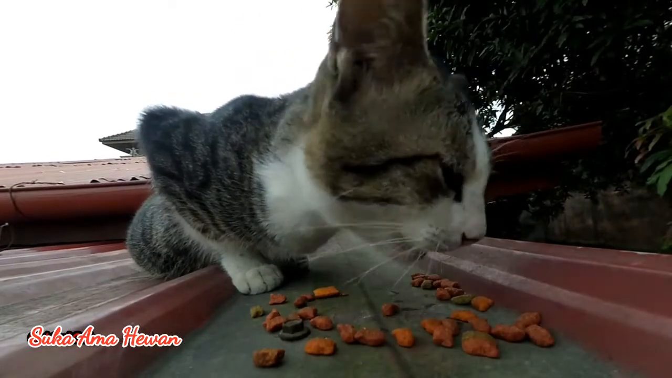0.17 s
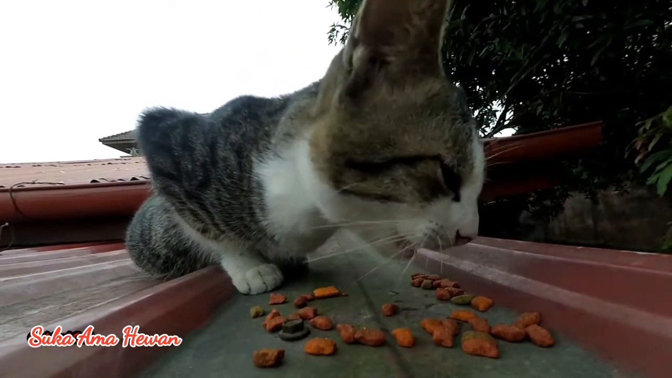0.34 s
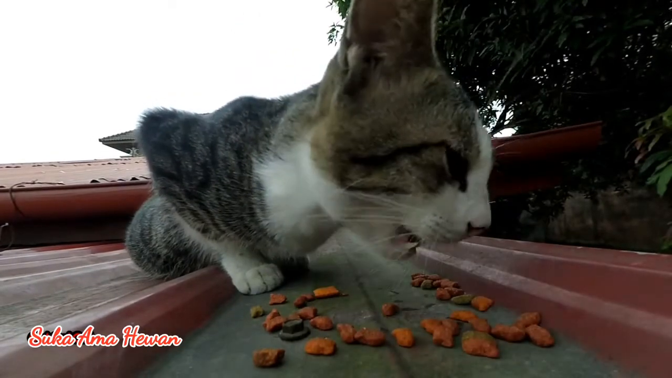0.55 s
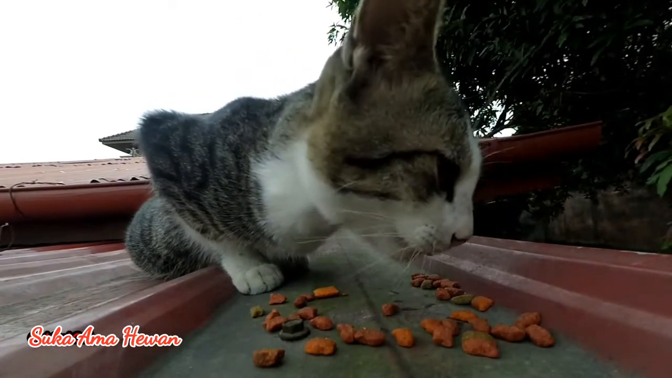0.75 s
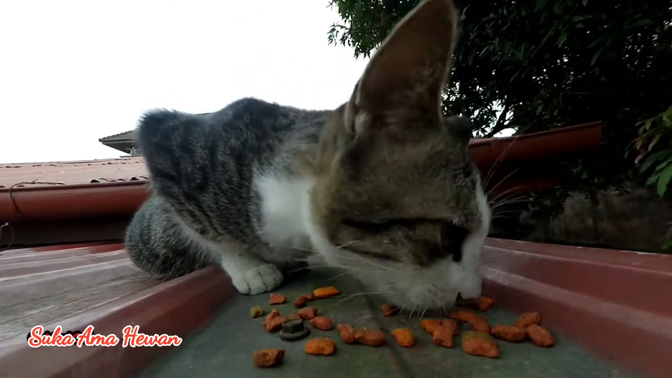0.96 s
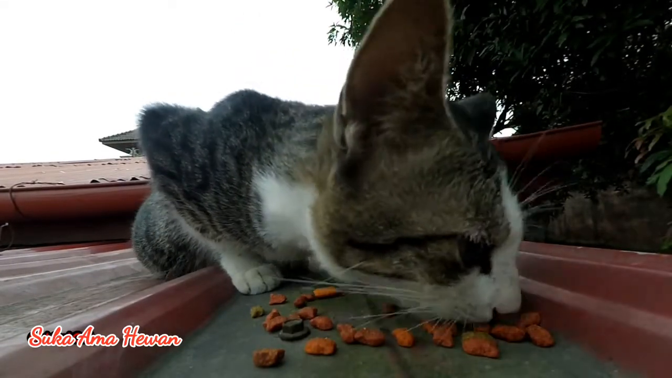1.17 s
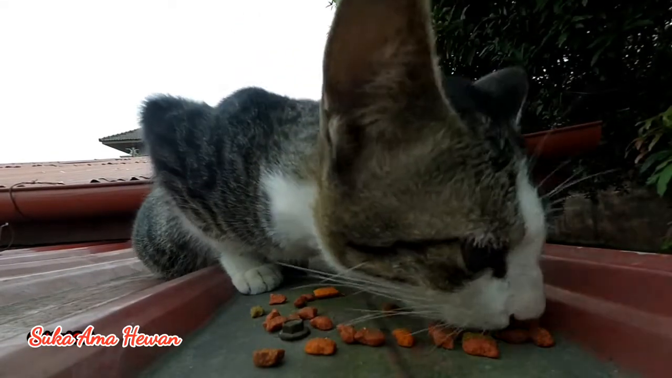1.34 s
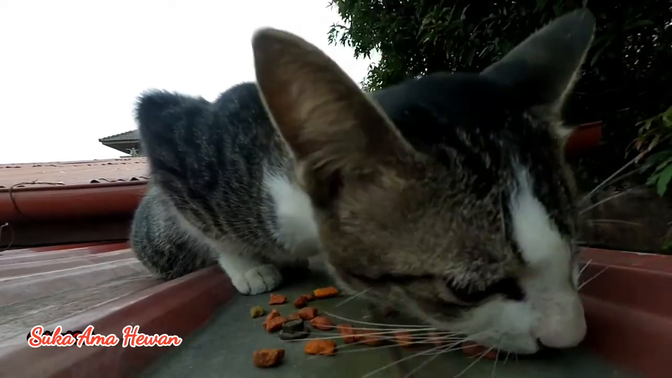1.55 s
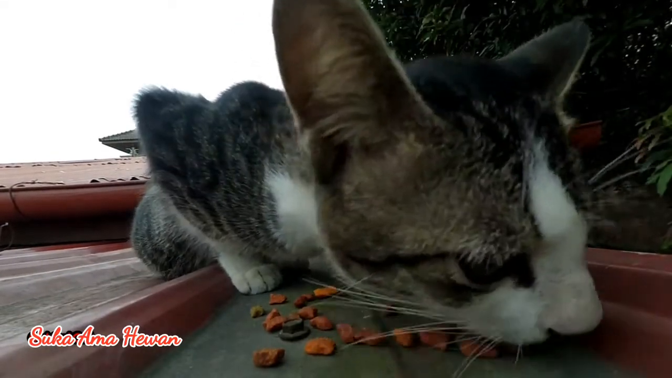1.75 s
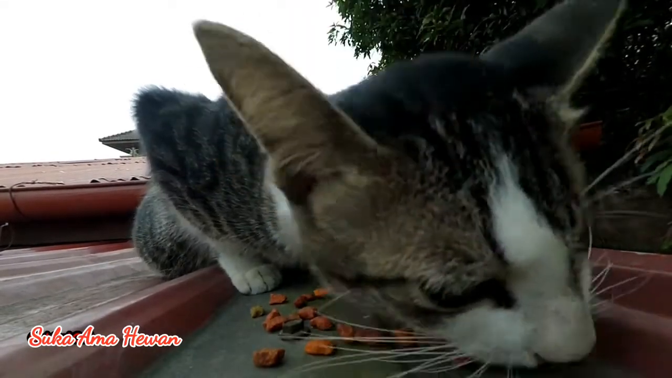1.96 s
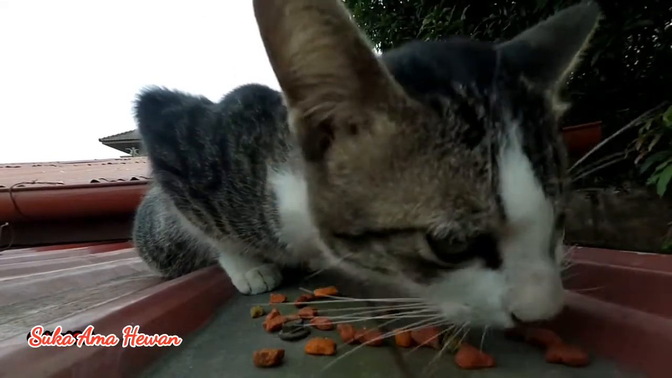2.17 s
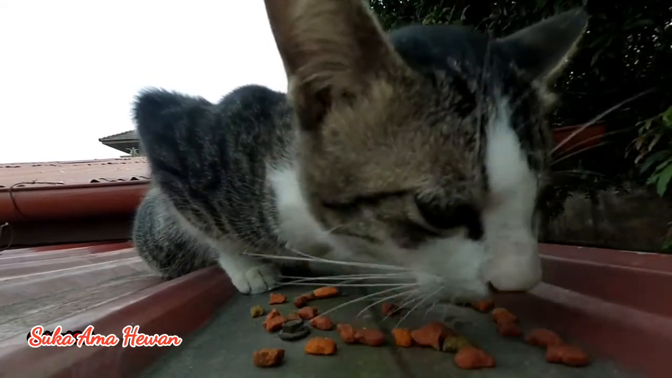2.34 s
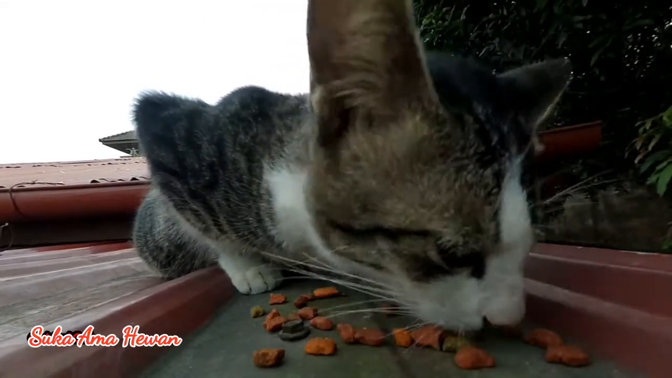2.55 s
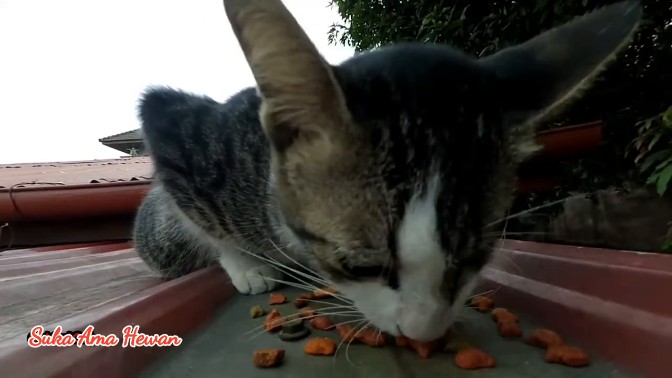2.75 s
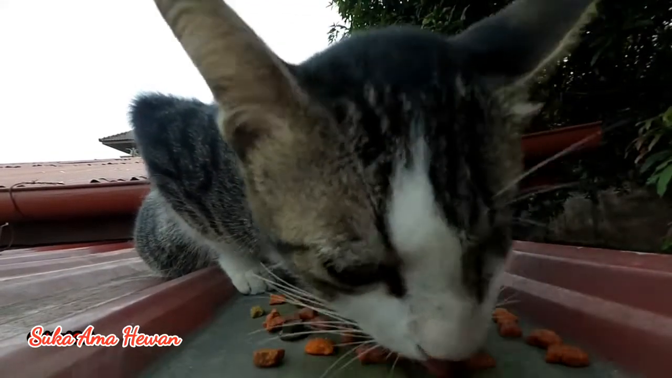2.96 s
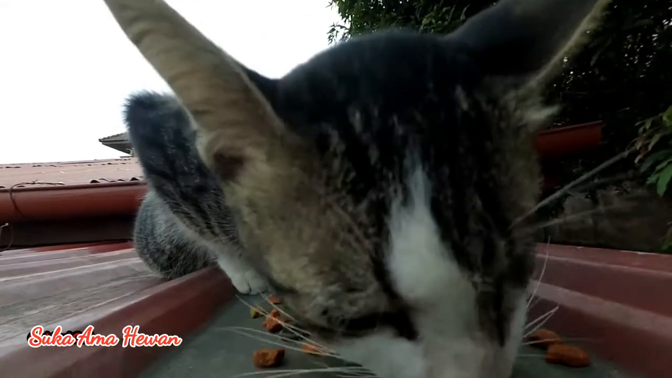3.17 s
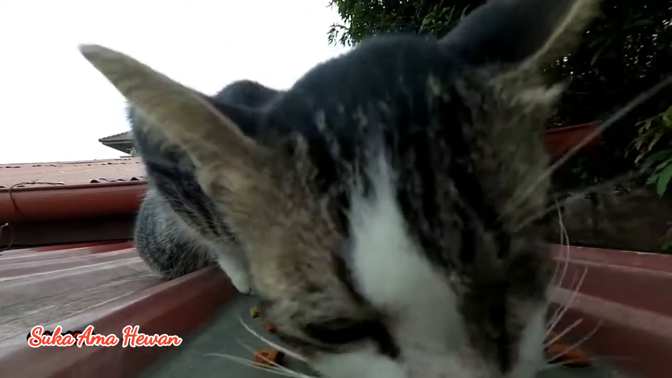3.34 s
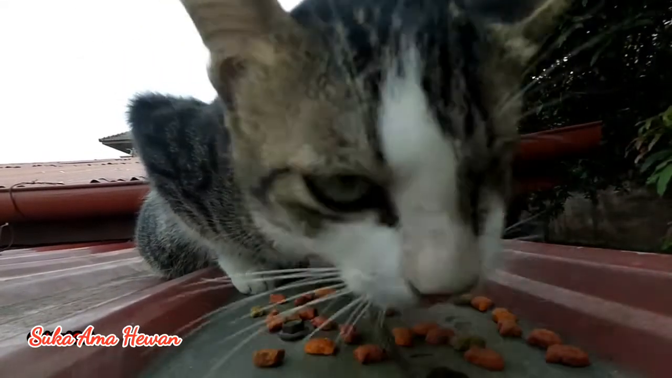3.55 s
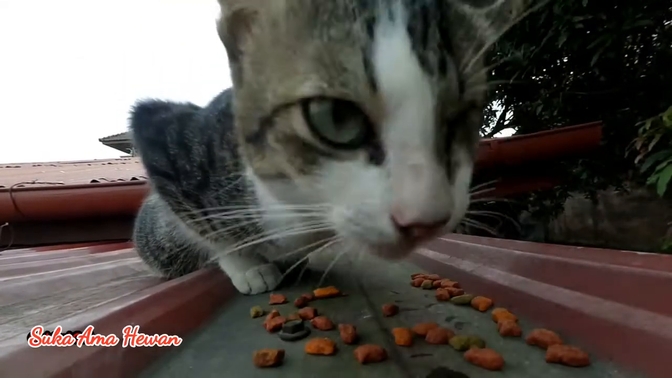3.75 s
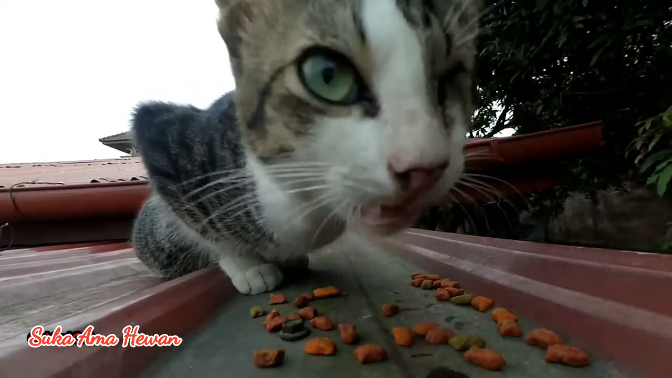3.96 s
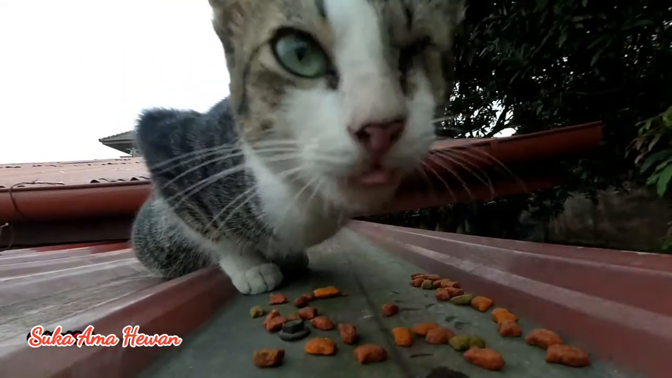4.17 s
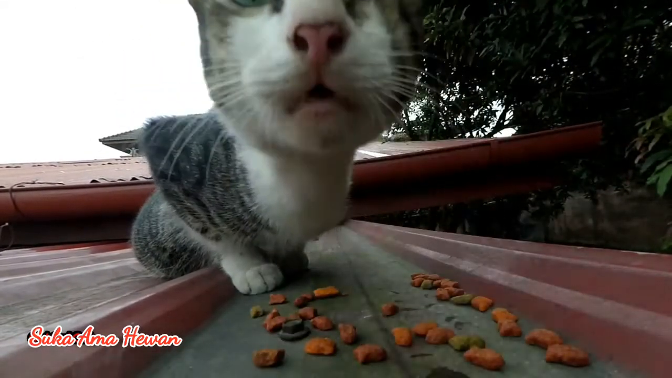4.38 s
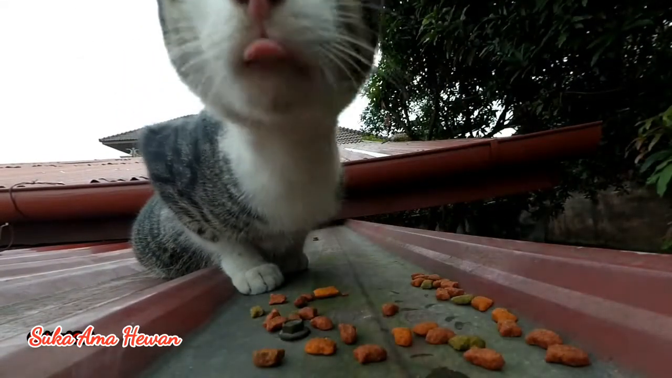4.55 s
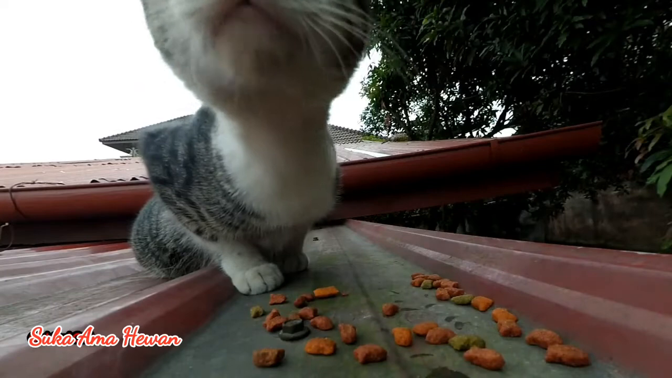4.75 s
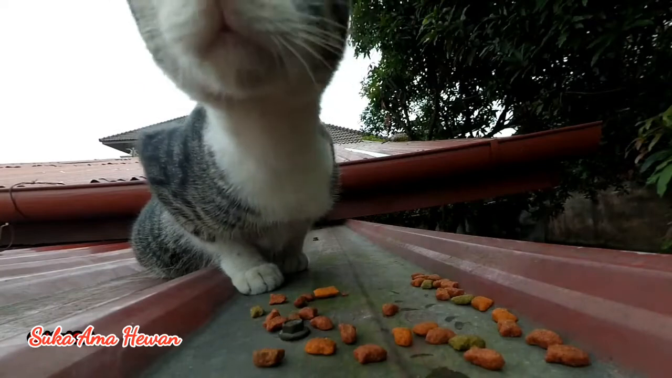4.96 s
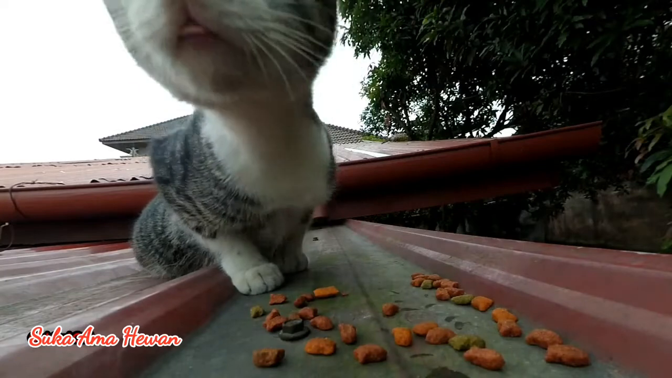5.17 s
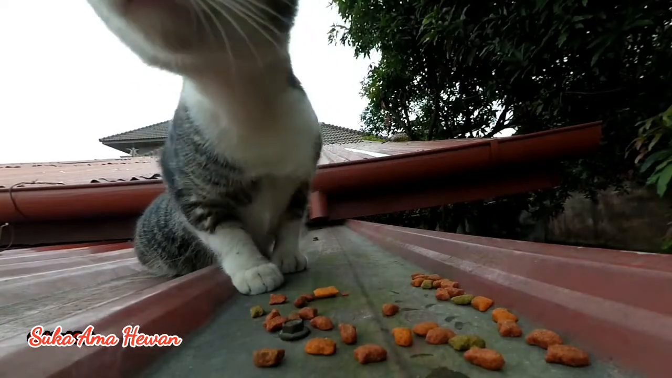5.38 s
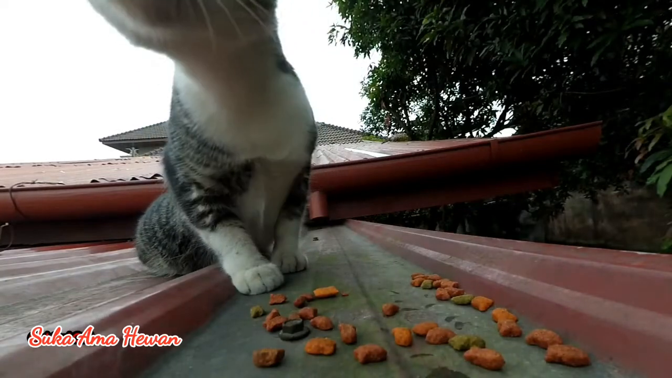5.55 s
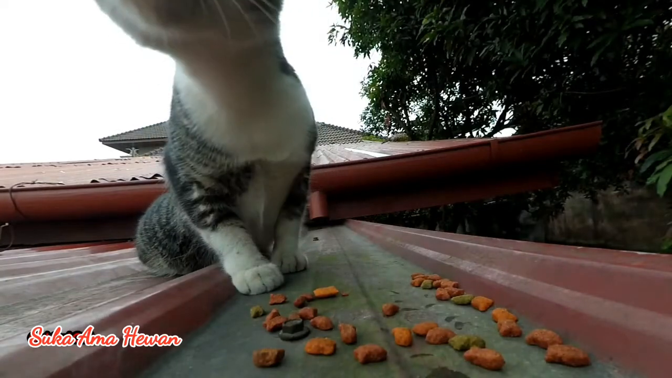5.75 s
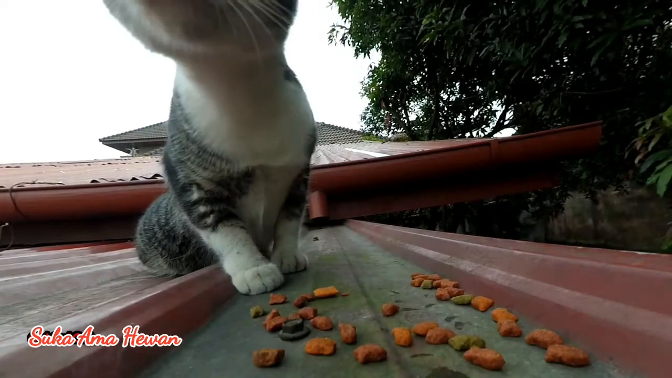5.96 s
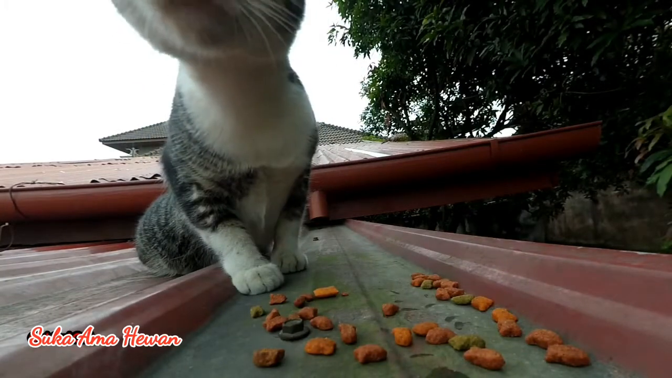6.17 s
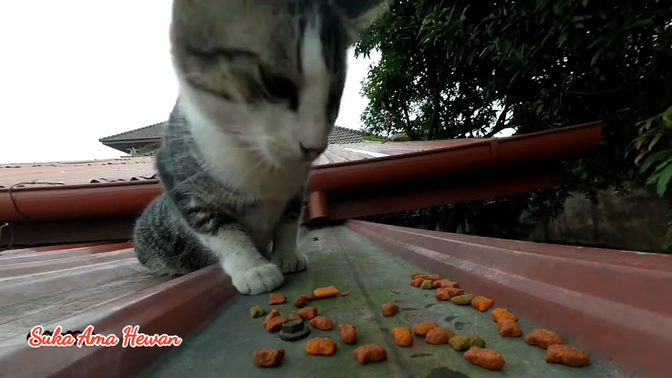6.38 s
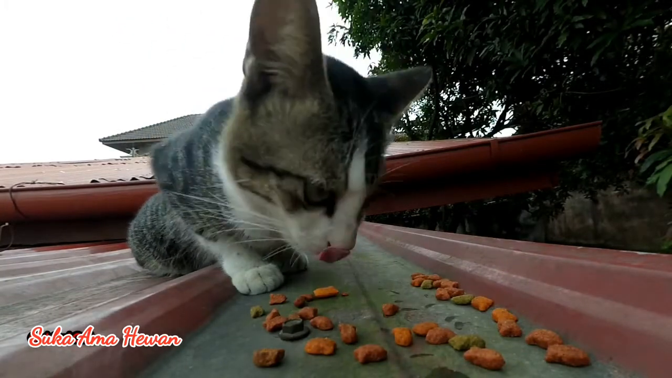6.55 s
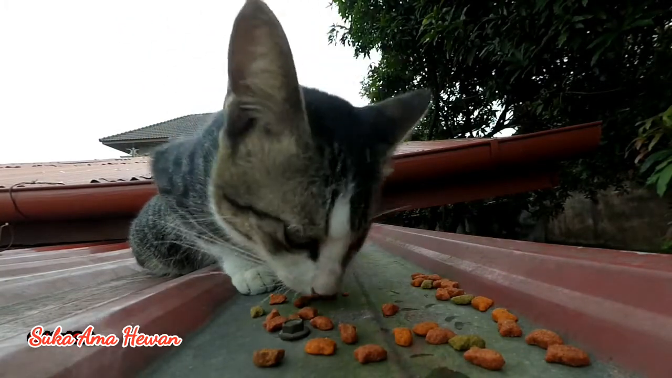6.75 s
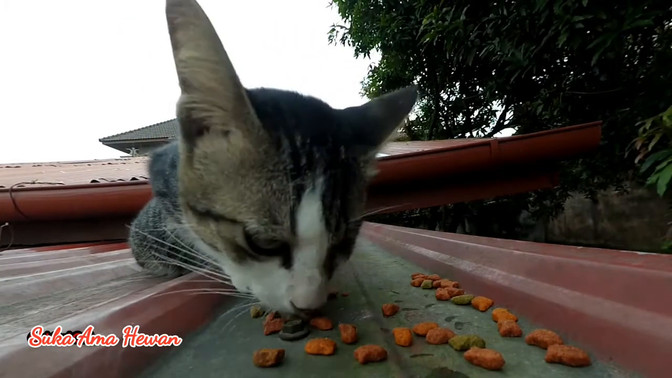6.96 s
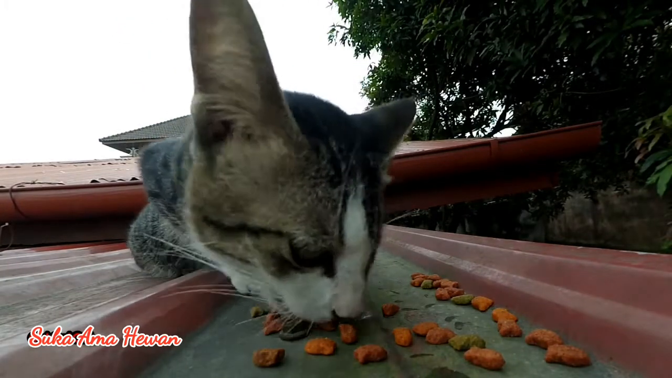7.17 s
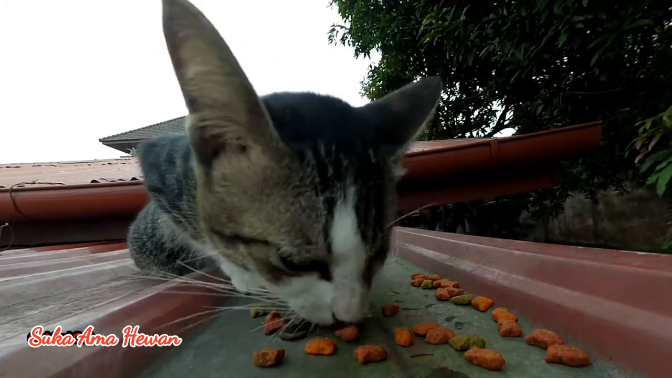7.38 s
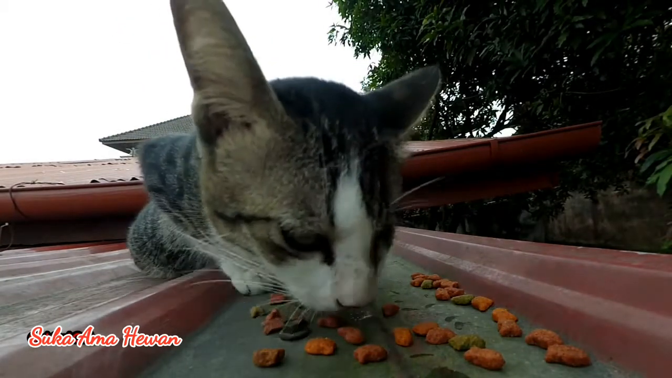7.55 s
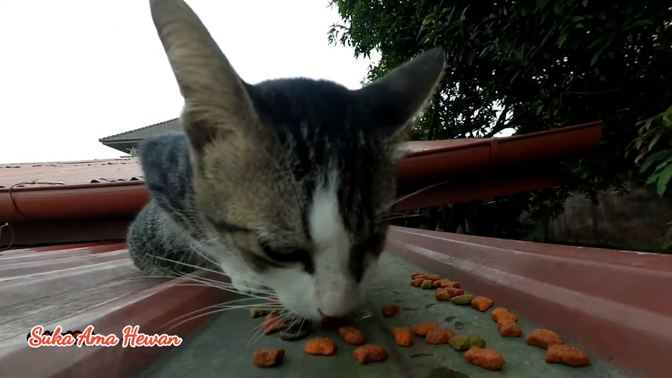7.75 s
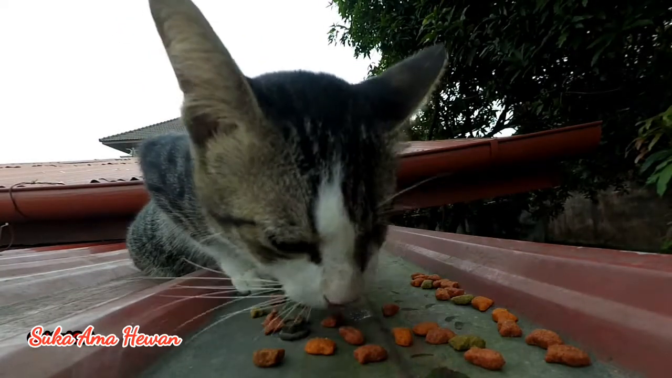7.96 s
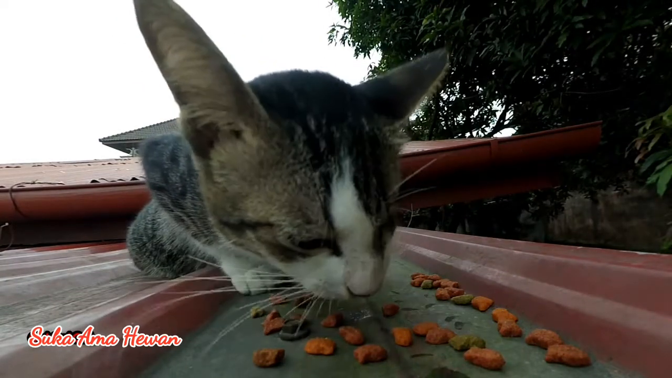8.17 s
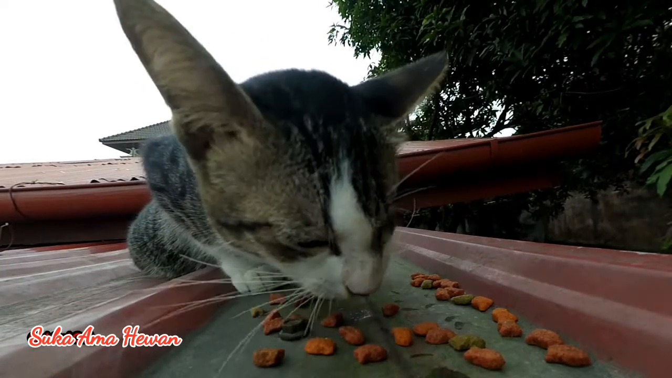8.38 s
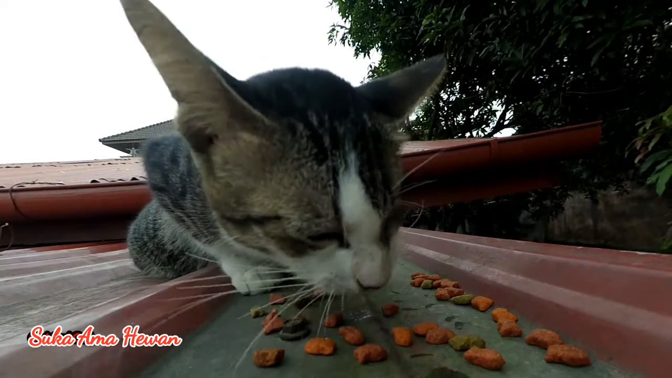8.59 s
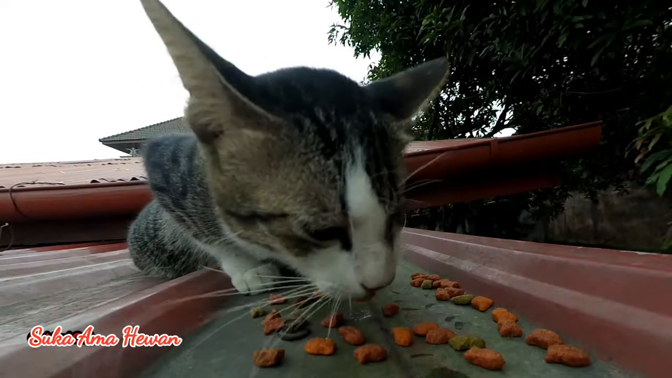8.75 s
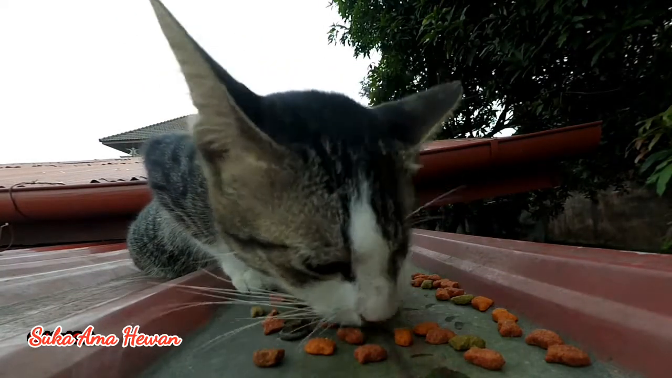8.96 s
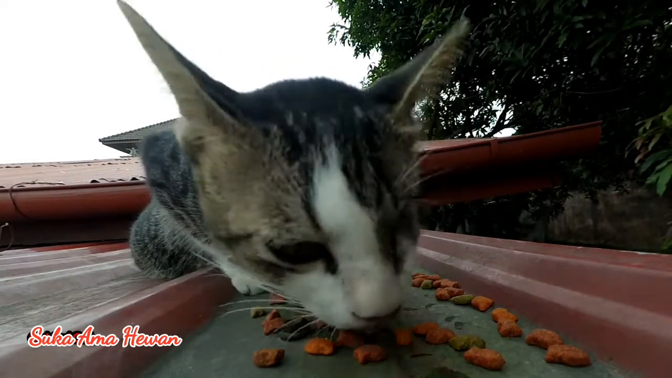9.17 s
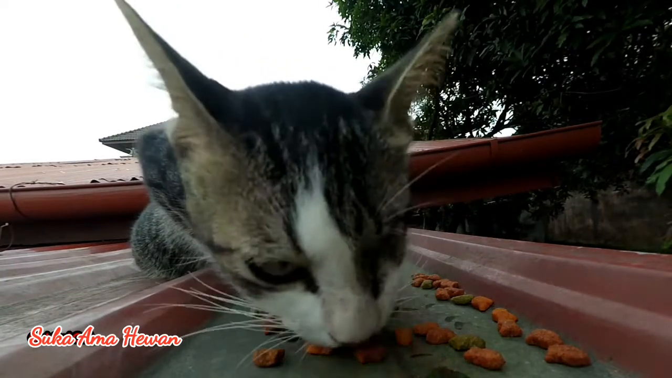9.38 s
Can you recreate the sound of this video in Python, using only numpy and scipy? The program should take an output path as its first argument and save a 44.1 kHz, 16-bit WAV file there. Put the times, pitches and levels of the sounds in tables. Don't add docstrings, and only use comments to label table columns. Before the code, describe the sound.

Brittle kibble cracks and low jaw knocks ring a thin sheet up close, then lip smacks, a quiet pause, and lighter, crisper crunching outdoors.

```python
import sys
import numpy as np
from scipy import signal
from scipy.fft import rfft, irfft, next_fast_len
from scipy.io import wavfile
from scipy.ndimage import map_coordinates

SR = 44100
rng = np.random.default_rng(int(sys.argv[2]) if len(sys.argv) > 2 else 0)


def log_audio(samples):
    frames = np.atleast_2d(samples).T
    limited = np.clip(frames, -1, 1)
    pcm = np.round(limited * 32767).astype(np.int16)
    wavfile.write(sys.argv[1], SR, pcm)


def to_linear_factor(level_db):
    exponent = np.asarray(level_db, float) / 20
    return 10 ** exponent


N = 415422


def unit(x):
    return x / np.sqrt(np.mean(x ** 2) + 1e-20)


def curves(rows):
    s, *columns = np.transpose(rows)
    return [np.interp(np.arange(N) / SR, s, c) for c in columns]


def wobble(rate_hz):
    knots = rng.standard_normal(int(N * rate_hz / SR) + 4)
    return map_coordinates(knots, [np.arange(N) * rate_hz / SR])


def swells(rows):
    t = np.arange(N) / SR
    levels_db = []
    for s, rise_s, fall_s, peak_db in rows:
        distance = np.maximum((s - t) / rise_s, (t - s) / fall_s)
        levels_db.append(peak_db - 12 * distance ** 2)
    return np.max(levels_db, axis=0)


def filtered(x, response):
    m = next_fast_len(N + SR // 2)
    return irfft(rfft(x, m) * response(np.fft.rfftfreq(m, 1 / SR)), m)[:N]


def along(points, hz):
    f, v = np.transpose(points)
    return np.interp(np.log(hz + 1), np.log(f + 1), v)


def noise(spectrum):
    return unit(filtered(rng.standard_normal(N), lambda hz: to_linear_factor(along(spectrum, hz))))


def resonate(x, modes):
    def body(hz):
        total = 0
        for k, (centre_hz, width_hz, db) in enumerate(modes):
            damping = 1j * hz * width_hz
            total = total + (-1) ** k * to_linear_factor(db) * damping / (centre_hz ** 2 - hz ** 2 + damping)
        return total
    gain = np.sqrt(np.mean(abs(body(np.arange(1, SR // 2, 2))) ** 2))
    return filtered(x, body) / gain


def grains(per_second, scatter_db, clump_db):
    sparse = rng.random(N) < per_second / SR
    size = rng.standard_normal(N) * to_linear_factor(-scatter_db * rng.random(N) + clump_db * wobble(90))
    return unit(sparse * size)


def splinters(times, length_s, rms_db, draw, scatter_db):
    place = draw[..., 0]
    creak, crumble = place < 0.15, place > 0.7
    length = length_s[:, None]
    late_s = (place - 0.15) / 0.55 * length
    late_s = np.where(crumble, length + 0.14 * (place - 0.7), late_s)
    late_s = np.where(creak, -0.035 * (0.15 - place), late_s)
    weak_db = np.where(crumble, -6 - 40 * (place - 0.7), -11 * (place - 0.15))
    weak_db = np.where(creak, -19 - 70 * (0.15 - place), weak_db)
    size = to_linear_factor(weak_db - scatter_db * draw[..., 1]) * np.sign(draw[..., 2] - 0.5)
    size = size / np.linalg.norm(size, axis=1, keepdims=True)
    size = size * (to_linear_factor(rms_db) * np.sqrt((length_s + 0.004) * SR))[:, None]
    at = np.clip(((times[:, None] + late_s) * SR).astype(int), 0, N - 1)
    return np.bincount(at.ravel(), size.ravel(), N)


# start in seconds, length in ms,
# strength in dB, hardness in dB, muffling by the closed mouth in dB.
BITES = [(1.207, 23.4, -47, -3.5, -8), (1.233, 4.8, -43, -4, -4), (1.2806, 4.9, -39.5, -1, -5),
         (1.3612, 9.4, -41, -6, -2), (1.4387, 24, -44.5, -5.5, 8), (1.478, 10.6, -42.5, -7, -2),
         (1.584, 3.76, -33.5, 6, -6.5), (1.63, 7.4, -42.5, -13, 0), (1.686, 13, -35.5, 0, -4.5),
         (1.7073, 23, -39.5, -1, 0), (1.7375, 3.16, -28, 1, -4), (1.752, 23.6, -42.5, -1.5, -4.5),
         (1.818, 4.4, -26, -4.5, 5.5), (1.8639, 4.8, -37, -4.5, 5), (1.9936, 4.43, -27.5, 5, -6.5),
         (2.0117, 13, -33, 6, -6.5), (2.028, 17, -37, 5, -5.5), (2.059, 4.85, -34, 6, -5),
         (2.0786, 14.7, -38, 0.5, -2), (2.116, 35, -45, -2.5, 5), (2.1942, 14.8, -47, 8.5, -3.5),
         (2.2238, 2.8, -39.5, -1, -1), (2.254, 4.5, -41.5, 5, 0.5), (2.2678, 13.8, -42, 6, 3),
         (2.762, 4.4, -49.5, -5, -5), (2.8051, 12.6, -43.5, -10, -8), (2.827, 8.6, -44.5, -2.5, -4),
                (2.8903, 16.6, -51, -5, 3), (2.934, 7.6, -52.5, -4, 12), (2.9874, 6.1, -45.5, 1, -3),
                (3.0941, 3.06, -34.5, 6, 15), (3.111, 7.5, -43, 10, 11), (3.141, 7.5, -44.5, 1, 3),
                (3.155, 6.5, -53, -14, 0), (3.2279, 11, -39, 11, 0.5), (3.241, 5.4, -40.5, -11, -5),
                (3.3013, 5.1, -41, -2, 5), (3.317, 7.5, -49.5, 1, -3), (3.4027, 5.5, -47.5, 3, 1),
                (3.422, 18.3, -42, 2, 0), (3.4479, 4.1, -42.5, 5, -3), (3.4622, 12.7, -45, 3, -4),
                (3.5185, 7.6, -62, -5, -1), (3.553, 4.8, -38, -4, 7), (3.532, 3.75, -52, -3, 8),
                (3.6891, 3.4, -40.5, 1, 4),
         (7.047, 32, -52.5, 0, -8), (7.242, 3.8, -47, 1.5, -9), (7.298, 4.03, -53, 11, 1),
              (7.3248, 2.4, -37.5, 18.5, -1), (7.341, 3.9, -43.5, 13, -5), (7.402, 7.9, -47, -3, 2),
              (7.413, 5.6, -37.5, 5.5, 17), (7.43, 3, -46, 11, 22), (7.4742, 8.4, -38.5, 12, 0),
              (7.5004, 4.2, -45, 16, -3), (7.517, 14.5, -53, -1, 7), (7.572, 3.2, -41.5, 9.5, 16),
              (7.6363, 4, -36, 28, 6), (7.683, 6, -50, 4, 18), (7.697, 6.7, -53.5, 2, 19),
              (7.9345, 1.4, -43, 23.5, 1), (7.9529, 3.1, -49, 2, -1), (8.007, 4.8, -47.5, 2, 0),
              (8.093, 4, -33.5, 20, 7.5), (9.2314, 2.3, -56, 11, -6), (9.2582, 12, -44.5, 8.5, -11),
              (9.2735, 3.15, -45, 20, 2), (9.4186, 1.4, -41.5, -3, -4),
         (2.034, 4.2, -39, 7, -7), (2.04, 5.1, -36, -11, -1), (7.6321, 1.7, -49, 14, -6),
               (2.105, 5.3, -47, -1, 0), (2.131, 3.4, -52, 5, -1), (2.184, 2.8, -45.5, -7, 4),
               (7.333, 2.8, -44, 15, -1), (7.484, 5.3, -44, 6, 0), (7.496, 3, -50, 15, -14),
               (7.602, 4, -59, 3, -3), (7.657, 3.2, -66, 10, -8), (8.104, 4.6, -57, 14, 1)]
# centre in Hz, width in Hz, level in dB.
THUD = [(240, 98, -11.5), (310, 236, -3), (404, 92, 2.5), (470.6, 49, 2), (640, 480, -13.5)]
LOW_RING = [(1029, 37, 0.33), (1234, 141, 4.5), (1380, 164, 4.74)]
NEAR_MID_RING = [(1589, 46, 1), (1970, 60, -8.5), (2120, 91, -4.5)]
FAR_MID_RING = [(1586, 96, -4), (1970, 140, -1.5), (2153, 145, 1.5)]
CENTRE_RING = [(2540, 242, 13), (2820, 420, 0.81)]
UPPER_RING = [(3225, 240, -3.5), (3450, 290, 4), (3960, 1180, -8)]
SNAP = [(4680, 350, 0), (5100, 350, -2), (5700, 400, -7), (6300, 600, -9), (7600, 700, -12),
        (8700, 700, -12), (11500, 3500, -23)]


def cracks():
    s, ms, db, hard_db, muffle_db = np.transpose(BITES)
    move_s = 5
    far, length_s = s > move_s, ms / 1000
    moved = np.arange(N) > move_s * SR
    coarse, fine, finer = np.swapaxes(rng.random((len(s), 3, 80, 3)), 0, 1)
    fine[..., 0] = finer[..., 0] = coarse[..., 0]

    ring_db = db + hard_db / 2
    low_db = db - hard_db / 2 - 2.5 - 0.5 * far
    mid_db = db - 3.5 + 0.3 * hard_db + 0.48 * muffle_db
    centre_db = ring_db + 0.66 + far * (-1 - 0.12 * muffle_db)
    upper_db = ring_db + np.where(s < move_s, -5 - 0.43 * muffle_db, -4.5 + 0.15 * muffle_db)
    snap_db = ring_db - 20.5 - 1.23 * muffle_db + far * (2.5 + 0.42 * muffle_db)

    low = splinters(s, length_s, low_db, coarse, scatter_db=5.5)
    mid = splinters(s, length_s, mid_db, fine, scatter_db=9.5)
    centre = splinters(s, length_s, centre_db, coarse, scatter_db=6.5)
    upper = splinters(s, length_s, upper_db, finer, scatter_db=9)
    snap = splinters(s, length_s, snap_db, fine, scatter_db=6)

    body = resonate(low, LOW_RING) + to_linear_factor(-8) * resonate(low, THUD)
    body = body + to_linear_factor(1.5) * resonate(mid * ~moved, NEAR_MID_RING) + resonate(mid * moved, FAR_MID_RING)
    body = body + resonate(centre, CENTRE_RING) + resonate(upper, UPPER_RING)
    blunt = filtered(body, lambda hz: 1 / (1 + 1j * hz / 5000) ** 2)
    return 1.14 * blunt + resonate(snap, SNAP)


# start in seconds, peak in dB, pitch in Hz.
THUDS = [(1.365, -34.5, 453), (1.582, -30, 362), (1.601, -27, 410), (1.626, -24.5, 398),
         (1.694, -24.5, 285), (1.732, -30, 400), (1.816, -22.5, 420), (1.877, -34, 342),
         (2.028, -25.5, 310), (2.052, -28.5, 407), (2.123, -35, 394), (2.223, -33.5, 393),
         (2.812, -37, 344), (3.093, -47, 363), (3.241, -35.5, 483), (3.261, -32.5, 400),
         (3.408, -34.5, 447), (3.465, -28.5, 404), (3.553, -36.5, 443), (3.69, -38.5, 450)]


def thuds():
    out, t = np.zeros(N + SR), np.arange(SR // 12) / SR
    for s, db, hz in THUDS:
        knock = np.sin(2 * np.pi * hz * t) + 0.42 * np.sin(2 * np.pi * 0.6 * hz * t)
        envelope = to_linear_factor(db + 4 - 60 * t / 0.035) * (1 - np.exp(-t / 0.0019))
        out[round(s * SR):][:len(t)] += envelope * knock
    return out[:N]


# peak time in seconds, rise in seconds, fall in seconds, peak in dB.
GRIND = [
    (1.55, 0.25, 0.69, -52.5),
    (2.16, 0.17, 0.28, -48),
    (2.38, 0.03, 0.046, -51.5),
    (2.84, 0.075, 0.35, -54),
    (3.44, 0.31, 0.22, -48.5),
    (7.08, 0.055, 0.087, -60),
    (7.47, 0.28, 0.1, -54),
    (7.72, 0.045, 0.1, -63),
    (8.18, 0.038, 0.082, -63),
    (9.1, 0.018, 0.043, -53.5),
]
# centre in Hz, width in Hz, level in dB.
RING = [(2562, 440, 11), (2760, 200, -4), (3320, 260, 1.5), (4000, 900, -2.5)]


def grinding():
    coarse, fine = grains(700, 16, 5.8), grains(1200, 14, 3.3)
    low = to_linear_factor(2) * resonate(coarse, THUD) + resonate(coarse, LOW_RING)
    low = low + to_linear_factor(-3.5) * resonate(coarse, NEAR_MID_RING)
    high = resonate(fine, RING) + to_linear_factor(-26) * resonate(fine, SNAP)
    return to_linear_factor(swells(GRIND) - 6.5) * (low + high)


# frequency in Hz, t60 in seconds.
SHEET_TAIL = [(300, 0.42), (1200, 0.21), (2500, 0.07), (6000, 0.14), (12000, 0.019)]


def sheet(x):
    hz, t, z = signal.stft(rng.standard_normal(SR // 3), SR, nperseg=128)
    decay = to_linear_factor(-60 * t / along(SHEET_TAIL, hz)[:, None])
    tail = signal.istft(z * decay, SR, nperseg=128)[1]
    return signal.fftconvolve(x, tail / np.linalg.norm(tail))[:N]


# start in seconds, peak in dB, mouth pitch in Hz, pop in dB, snap in dB.
CLICKS = [(0.1833, -40, 2330, -4, -8.5), (0.412, -47, 2270, -15, -33), (0.4774, -31.5, 1790, -7.5, -8),
          (0.493, -45, 2050, -20, -11), (0.5132, -36.5, 2140, -15, -15), (0.5478, -32, 1780, -10, -9),
          (0.594, -27.5, 1700, -8, -10.5), (0.6098, -44.5, 2460, 0, -9), (0.7665, -41, 2890, -11, -33),
          (1.0215, -38.5, 2300, 2, -18), (4.0744, -45.5, 2730, 2, -27), (4.0981, -47, 2190, 5, -25),
          (4.128, -43, 2010, -15, -25), (4.1845, -40.5, 2430, 11, 2), (4.217, -47, 2760, -11, -4),
          (4.278, -48, 2400, -9, -12.5), (8.33, -27.5, 2080, -11.5, -17.5), (8.3652, -28, 1920, -8, -28),
          (8.5735, -25, 1723, -5.5, -10), (8.7324, -43, 1640, 13, 4.5)]
# peak time in seconds, rise in seconds, fall in seconds, peak in dB.
LICKS = [(.13, 0.03, .12, -69), (.34, 0.15, 0.018, -66), (.575, .05, .1, -72), (1.01, 0.071, 0.038, -61.5),
         (3.82, 0.026, 0.21, -69.5), (4.08, 0.031, .03, -67), (4.16, .04, 0.11, -62.5),
         (4.37, 0.044, 0.09, -65.5), (4.455, 0.04, 0.05, -56.5), (4.53, .015, .03, -65),
         (5.98, 0.026, 0.044, -68)]
SMACK = [
    (4.455, .05, .045, -66),
]
# centre in Hz, width in Hz, level in dB.
WET = [(2900, 1200, 3), (4500, 830, 7), (6300, 880, 5), (8200, 640, 4), (11600, 2400, -13.5)]
LICK = [(1890, 370, 3.5), (2800, 370, 2)]
LICK_OPEN = [(2350, 2300, 0)]
SMACK_BAND = [(4500, 310, 0)]


def mouth():
    out, edge, t = np.zeros(N + SR), np.zeros(N + SR), np.arange(SR // 30) / SR
    for s, db, hz, pop_db, snap_db in CLICKS:
        here = slice(round(s * SR), round(s * SR) + len(t))
        phase = 2 * np.pi * hz * t + np.cumsum(rng.normal(0, 0.096, len(t)))
        tone = to_linear_factor(-60 * t / 0.019) * (np.sin(phase) + 0.11 * np.sin(2.1 * phase))
        pop = to_linear_factor(pop_db - 60 * t / 0.032) * np.sin(2 * np.pi * 440 * t)
        out[here] += to_linear_factor(db - 2) * (tone + pop) * (1 - np.exp(-t / 0.0004))
        edge[here] += to_linear_factor(db + snap_db + 1.5 - 60 * t / 0.0077) * rng.standard_normal(len(t))
    wet = grains(3400, 14, 1)
    smack = to_linear_factor(swells(SMACK)) * unit(resonate(wet, SMACK_BAND))
    licks = to_linear_factor(swells(LICKS)) * unit(resonate(resonate(wet, LICK), LICK_OPEN))
    return out[:N] + resonate(edge[:N], WET) + smack + licks


# start in seconds, peak in dB, pitch in Hz, brightness
# in dB.
FAINT_TICKS = [(0.4559, -53, 2100, -12), (0.5674, -55, 2900, -9), (0.5754, -48, 2300, -8),
               (3.8282, -44.5, 2420, -21), (3.8531, -48, 2430, -17), (3.9153, -47, 2320, -15),
               (4.0677, -47, 2850, -19), (4.153, -42, 1770, -25), (4.168, -48, 2340, -19),
               (4.248, -53, 2800, -9), (4.263, -52, 2805, -11),
               (4.3525, -48, 2300, -18), (4.4226, -50, 1980, -22), (4.444, -47, 1940, -23),
         (4.5263, -47, 2280, -23), (4.5866, -44.5, 3360, -19), (4.628, -57, 1850, -12),
         (4.704, -54, 2940, -10), (4.7169, -54, 1900, -22), (4.8815, -52, 2890, -13),
         (4.9023, -46, 2550, -15), (4.9399, -57, 2500, -12), (4.957, -55, 2460, -13),
         (4.9803, -47, 2060, -28), (5.0074, -44.5, 2620, -26), (5.1937, -53, 2090, -8),
         (5.4348, -53, 2630, -13), (5.5201, -53, 2810, -15), (5.567, -49, 2920, -13),
         (5.586, -53, 2880, -12), (5.6473, -62, 2010, -14), (5.7086, -56, 3080, -11),
         (5.8199, -59, 2090, -11), (5.8952, -53, 2280, -8), (5.9133, -47, 2760, -16),
         (5.9325, -50, 1880, -14), (5.9655, -51, 2390, -15), (6.0873, -60, 2350, -6),
         (6.1327, -61, 2090, -9.5), (6.2112, -49, 2350, -13), (6.227, -49, 3310, -16),
         (6.3377, -56, 3340, -9), (6.3966, -57, 2590, -12), (6.44, -60, 2260, -13),
         (6.4589, -51.5, 3780, -15), (6.5168, -57, 2360, -9), (6.5876, -43.5, 2360, -16),
         (6.6066, -53, 2560, -18), (6.6211, -49, 3300, -13), (6.649, -49.5, 1970, -12),
         (6.709, -49.5, 2490, -16), (6.7776, -53, 3320, -16), (6.8184, -51, 2900, -15),
         (6.8301, -48, 2920, -17), (6.883, -47.5, 2430, -13), (6.9229, -49, 2350, -16),
         (6.9528, -54, 2120, -13), (6.9705, -50, 2160, -19), (6.9842, -48, 2950, -19),
               (8.203, -55, 2330, -12), (8.22, -53, 2140, -9), (8.239, -56, 2500, -6),
              (8.253, -48, 2570, -14), (8.2714, -52, 2390, -12), (8.318, -63, 2800, -5),
              (8.3894, -55, 2820, -12), (8.4355, -58, 2870, -10), (8.525, -61, 1680, -14),
              (8.546, -56, 1950, -14), (8.5577, -58, 2620, -15), (8.5914, -54, 2110, -22),
              (8.6462, -53, 2960, -10), (8.651, -50, 3300, -14), (8.6717, -59, 2500, -14),
              (8.6874, -55, 2800, -12), (8.724, -56, 2900, -14), (8.7385, -44, 4000, -16),
              (8.7685, -54, 2850, -15)]
# centre in Hz, width in Hz, level in dB.
TICK_EDGE = [(6100, 700, 0), (8700, 900, -4.5)]
CRACKLE_BANDS = [(6100, 390, -2), (8950, 620, -3.5), (2900, 880, 1.5)]
# peak time in seconds, rise in seconds, fall in seconds, peak in dB.
RUSTLE = [
    (.1, 0.46, 5.6, -70.5),
    (5.4, 1.7, .45, -74.5),
    (9.4, 2.4, 0.88, -69.5),
]


def leaves():
    s, db, hz, bright_db = np.transpose(FAINT_TICKS)
    t = np.arange(SR // 50) / SR
    waver = np.cumsum(rng.normal(0, 0.2, (len(s), len(t))), axis=1)
    envelope = to_linear_factor(db[:, None] - 3 - 60 * t / 0.016) * (1 - np.exp(-t / 0.00041))
    tone = envelope * np.sin(2 * np.pi * hz[:, None] * t + waver)
    tones = np.bincount(((s[:, None] + t) * SR).astype(int).ravel(), tone.ravel(), N)
    draw = rng.random((len(s), 8, 3))
    edge = splinters(s, np.full(len(s), 0.003), db + bright_db - 5.5, draw, scatter_db=0)
    crackle = to_linear_factor(-80 + 1.4 * wobble(3.5)) * grains(160, 13, 1.6)
    rustle = grains(900, 12, 3)
    rustle = to_linear_factor(swells(RUSTLE)) * (resonate(rustle, RING) + 0.16 * resonate(rustle, SNAP))
    return tones + resonate(edge, TICK_EDGE) + resonate(crackle, CRACKLE_BANDS) + rustle


# peak time in seconds, rise in seconds, fall in seconds, peak in dB, pitch in Hz.
FAR_CALL = [
    (2.5, .12, 0.25, -63.5, 784),
    (2.65, 0.14, 0.15, -70, 1750),
]


def far_call():
    waver = 1 + 0.04 * wobble(51)
    out = np.zeros(N)
    for *swell, hz in FAR_CALL:
        out += to_linear_factor(swells([swell])) * np.sin(2 * np.pi * np.cumsum(hz * waver) / SR)
    return out


def drone(hz, rows, orders):
    turn = 2 * np.pi * np.cumsum(hz + 2.23 * wobble(10)) / SR
    swell_db = swells(rows)
    return sum(to_linear_factor(swell_db + db + 2.5 * wobble(4)) * np.sin(k * turn) for k, db in orders)


# peak time in seconds, rise in seconds, fall in seconds, peak in dB.
HUM = [
    (2.5, 0.23, 0.36, -53),
    (3.3, 0.46, 0.8, -54),
    (5.6, 0.64, 0.23, -54.5),
    (9.4, 0.69, 0.76, -59),
]
ENGINE = [
    (3.75, 0.43, 0.66, -57),
    (6.3, .5, 1.2, -67.5),
]
# time in seconds, engine pitch in Hz.
ENGINE_PITCH = [(3.2, 64.6), (3.8, 70.3), (4.6, 69.3), (5.8, 57.84), (7.5, 67.5), (8.2, 69)]
# time in seconds, stir of the air in dB.
AIR = [(0, -2.5), (1.2, 1), (2, 2), (2.6, 2), (3.5, 0), (4.2, -2.5), (6.5, -4), (7.6, -0.5), (9.42, -3)]
# frequency in Hz, density in dB per Hz.
BUFFET = [(7.1, -47.5), (12, -7), (36, 3.5), (52, -1), (70, -27.5), (91, -47), (150, -120)]
TRAFFIC = [(29, -39), (50, -5), (118, -2.5), (216, -12), (395, -8), (611, -25.5), (900, -32), (1500, -93.5)]
HISS = [(350, -24), (600, -5.5), (1140, -4), (2640, -8.5), (4880, -11.5), (8520, -19), (14300, -24),
        (15500, -24)]


def background():
    stir_db, = curves(AIR)
    machine = drone(111.3, HUM, [(0.98, 2.8)])
    engine = drone(*curves(ENGINE_PITCH), ENGINE, [(1, -2.5), (2, 7), (3, -8), (4, -6.5)])
    buffet = to_linear_factor(-53.5 + 1.25 * stir_db + 3 * wobble(3.9)) * noise(BUFFET)
    traffic = to_linear_factor(-50 + stir_db + 2 * wobble(4)) * noise(TRAFFIC)
    hiss = to_linear_factor(-67 + 0.59 * stir_db + 2.2 * wobble(15)) * noise(HISS)
    return buffet + traffic + machine + engine + hiss


# frequency in Hz, density in dB per Hz.
SIDE_NOISE = [(5, -1), (40, 7), (150, -11.5), (300, -21), (850, -29), (1000, -66), (15500, -64)]


def scene():
    food = cracks() + thuds() + grinding()
    mid = food + to_linear_factor(-10.5) * sheet(food) + mouth() + leaves() + far_call() + background()
    side = to_linear_factor(-80.5) * noise(SIDE_NOISE)
    return np.array([mid + side, mid - side])


def roll_off(x):
    return signal.sosfilt(signal.butter(12, 16170, fs=SR, output="sos"), x)


OFFSET = [
    [.00043],
    [-.00318],
]


def record(dry):
    limited = np.array([filtered(channel, lambda hz: hz < 15400) for channel in dry])
    mix = limited + OFFSET
    return roll_off(mix)


dry = scene()
out = record(dry)
log_audio(out)
```